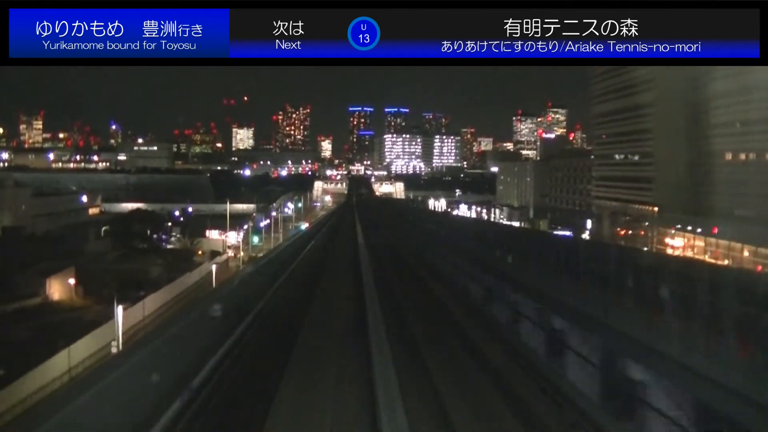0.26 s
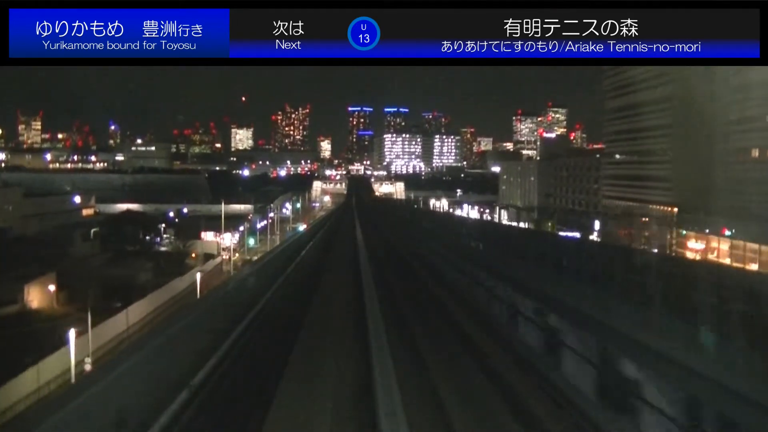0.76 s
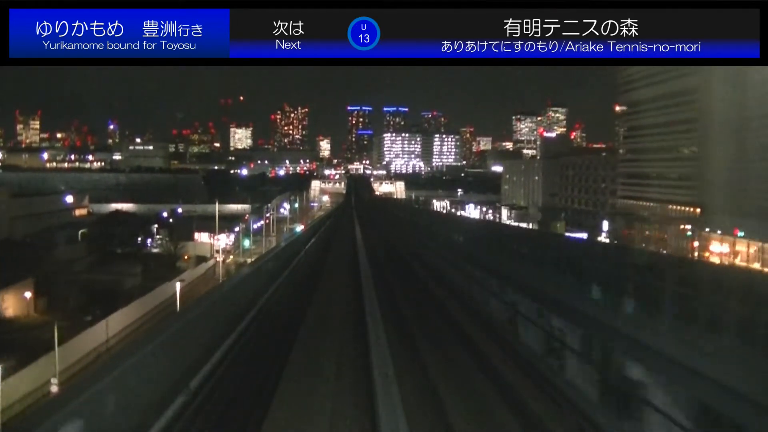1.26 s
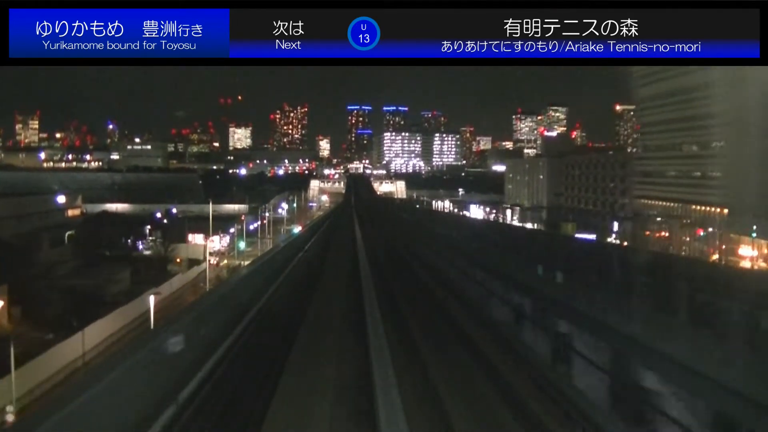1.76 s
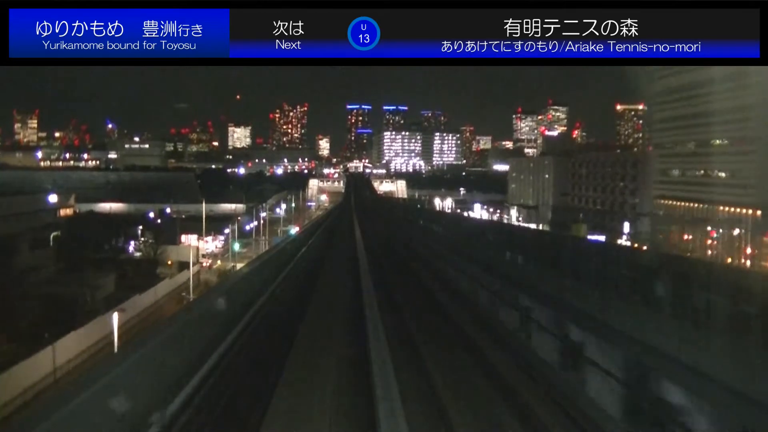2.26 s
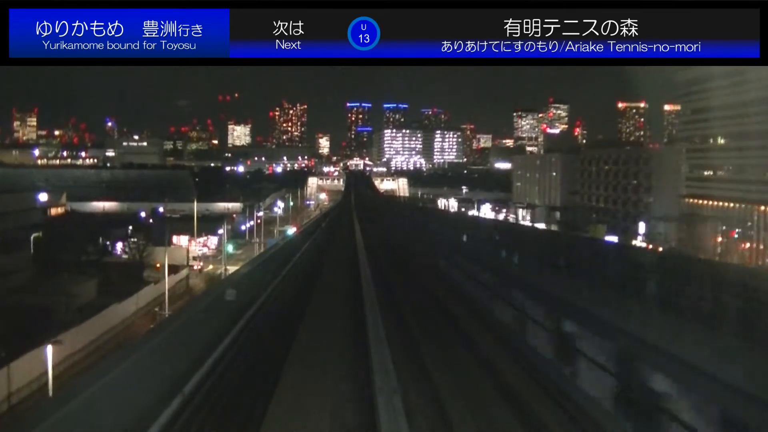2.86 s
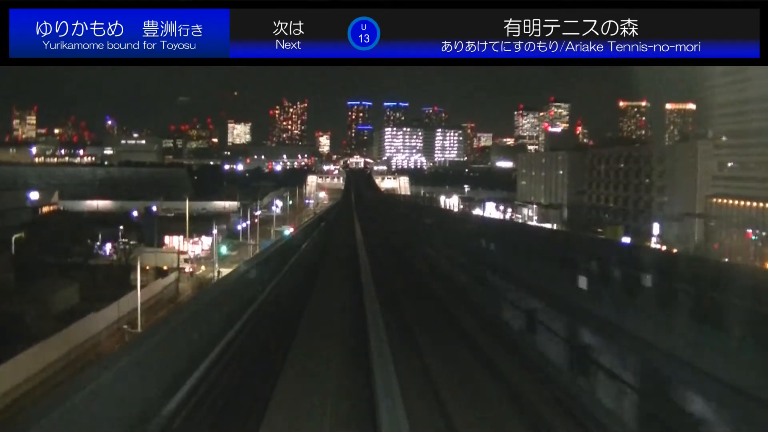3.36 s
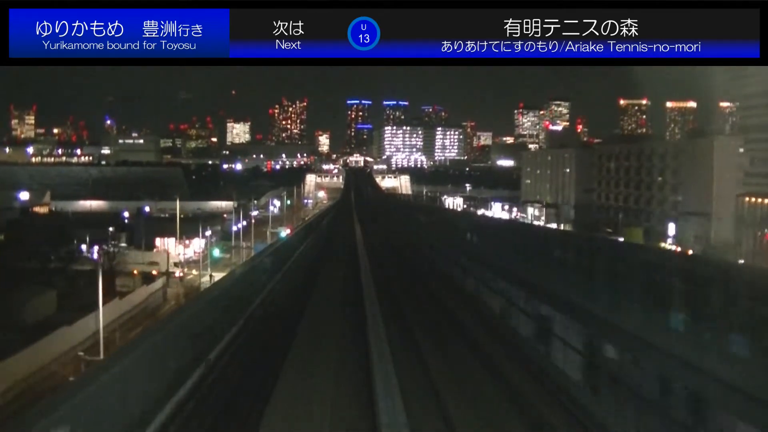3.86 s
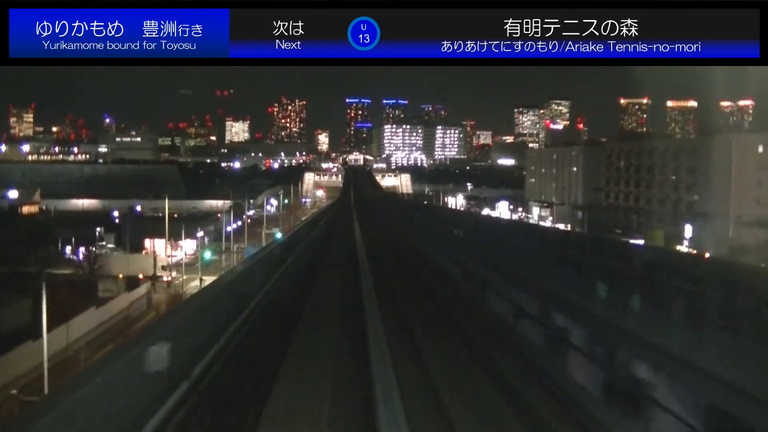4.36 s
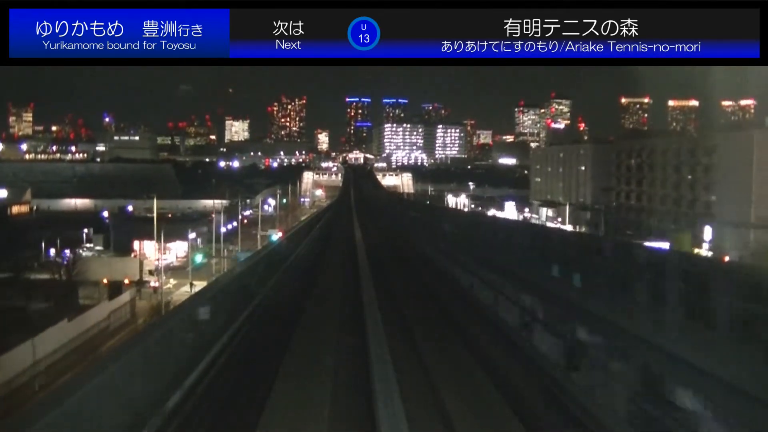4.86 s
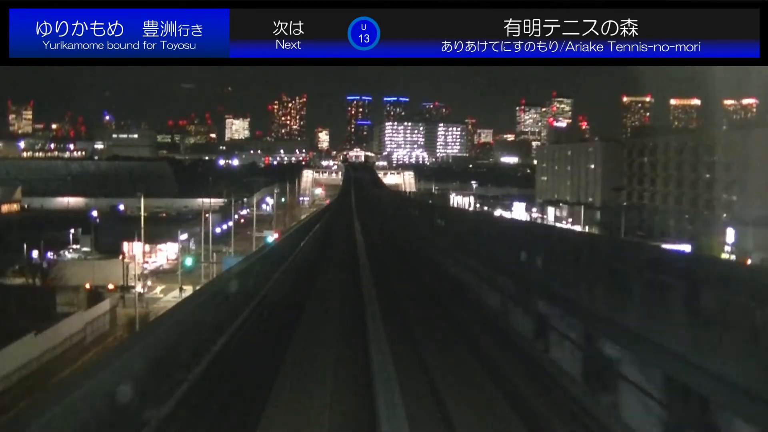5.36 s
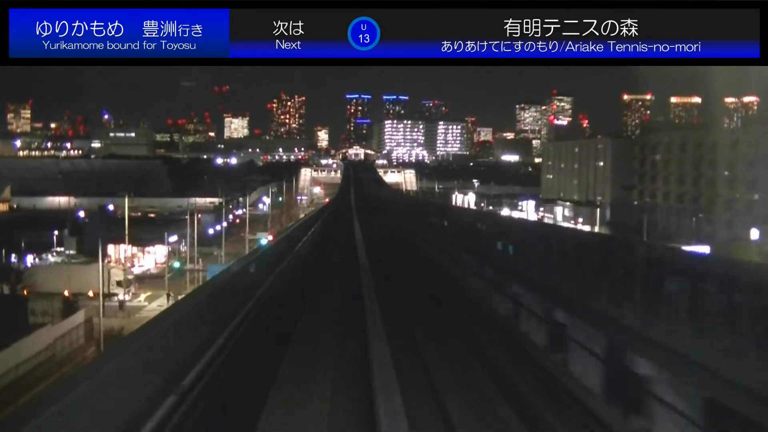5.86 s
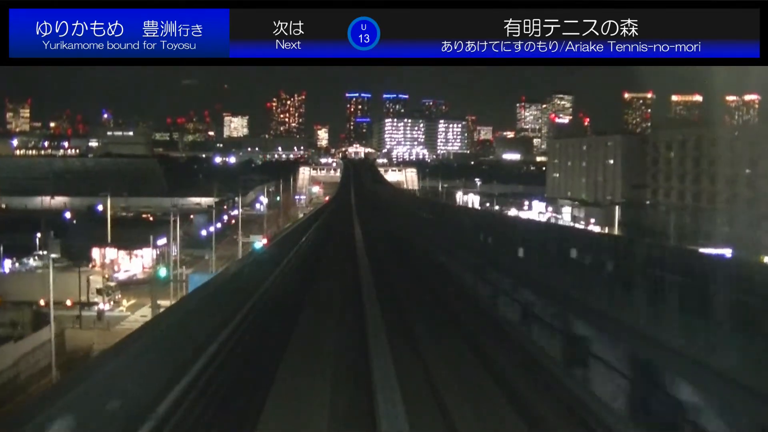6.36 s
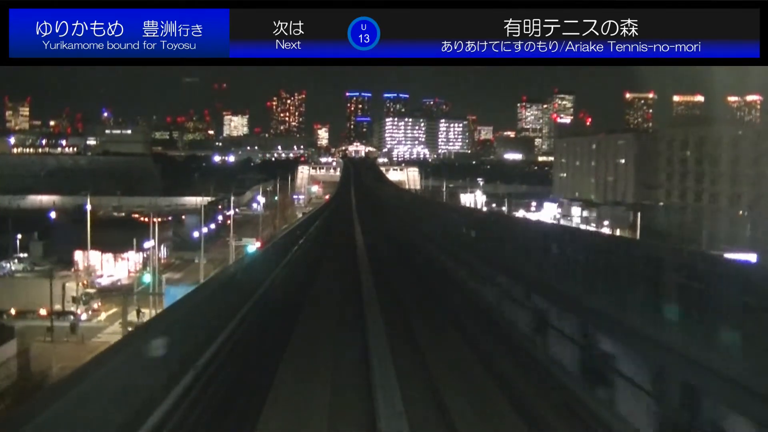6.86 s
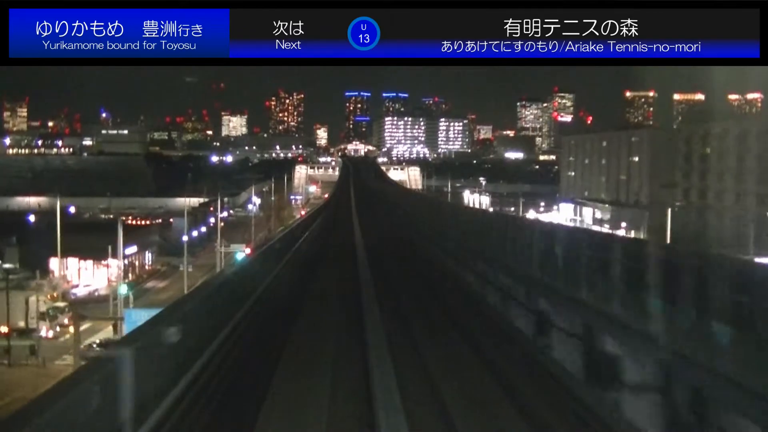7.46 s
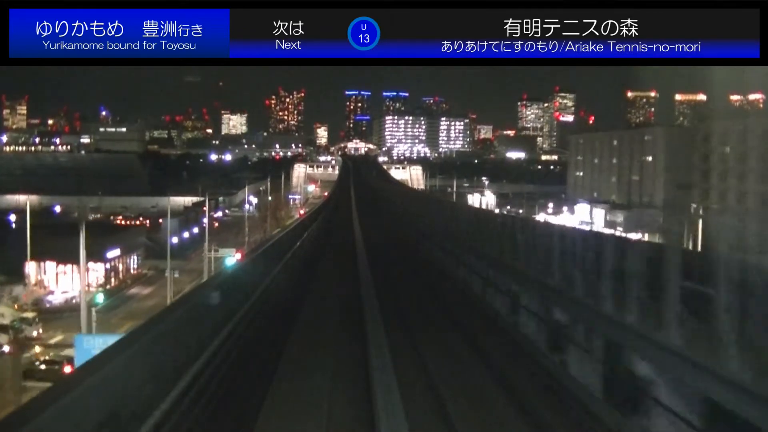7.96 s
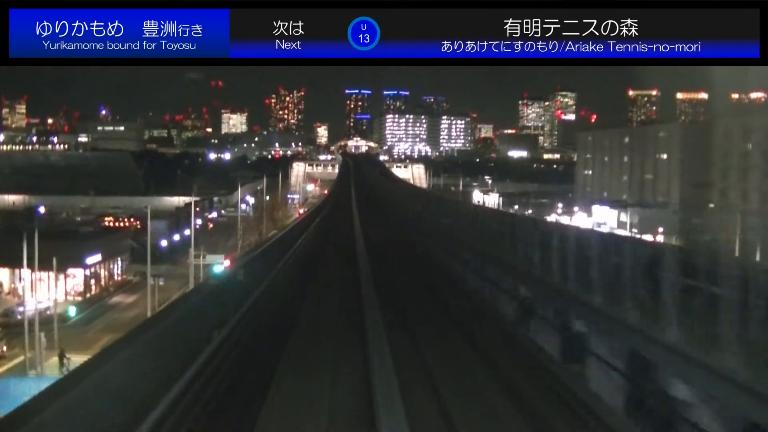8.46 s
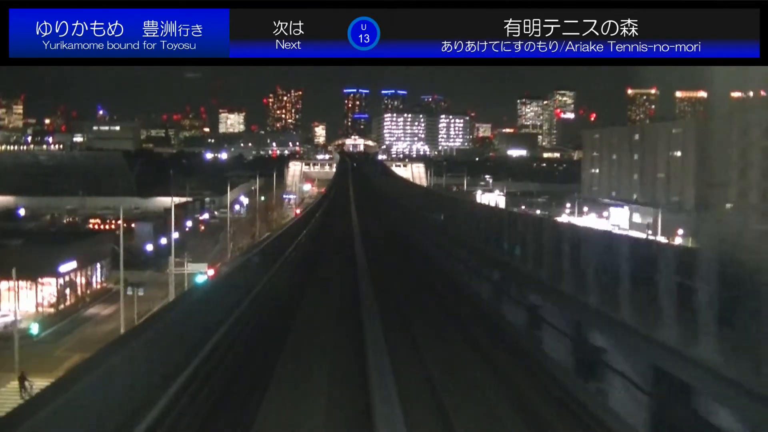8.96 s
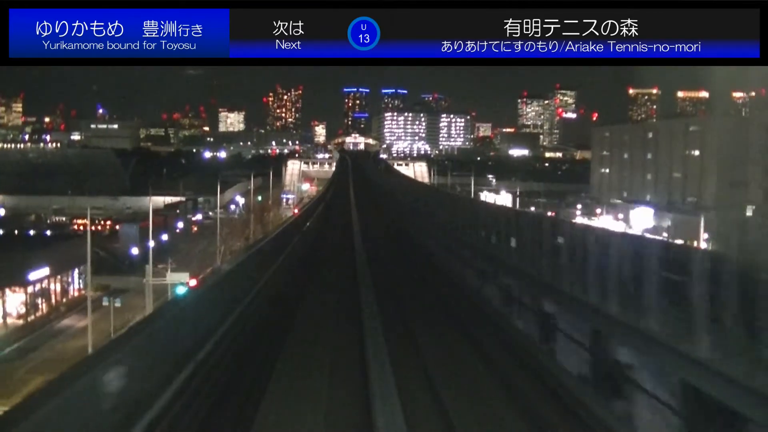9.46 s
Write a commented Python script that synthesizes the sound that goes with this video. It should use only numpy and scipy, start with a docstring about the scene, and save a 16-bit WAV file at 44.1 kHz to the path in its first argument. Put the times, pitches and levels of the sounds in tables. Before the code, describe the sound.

A rubber-tyred train rolls along concrete, heard from inside: steady rumble, dull bumps and a whine that climbs, then levels off.

```python
"""Riding a rubber-tyred train

Inside the front car, the train gathers speed on a concrete track, then cruises. The tyres roar,
the motors whine and beat, and at speed the whine comes in swells. The cabin booms, and bumps and
joints set floor and walls thudding. Gears hum, the inverter sings, and loose trim rustles and ticks."""
import sys
import numpy as np
from scipy import signal
from scipy.fft import rfft, irfft, next_fast_len
from scipy.io import wavfile
from scipy.ndimage import uniform_filter1d

SR = 44100
rng = np.random.default_rng(int(sys.argv[2]) if len(sys.argv) > 2 else 0)


def wrap_up_sound(samples):
    """Save the sound to the file named by the first command line argument, as 16-bit audio."""
    columns = np.atleast_2d(samples).T
    # keep every value between -1 and 1, then stretch to whole-number steps
    tamed = np.clip(columns, -1, 1)
    steps = np.round(tamed * 32767).astype(np.int16)
    wavfile.write(sys.argv[1], SR, steps)


N = 428652
TIME = np.arange(N) / SR
FFT_SIZE = 2 * next_fast_len(N // 2 + 1)
HZ = np.fft.rfftfreq(FFT_SIZE, 1 / SR)


# Coarser concrete roars louder. Each row: time in seconds, level in dB.
ROAR_LEVEL = [(0, -24.5), (.8, -22.5), (1.57, -22.5), (1.75, -20.5), (3.8, -19.5), (4.5, -21), (5.45, -19),
              (5.9, -21), (7.3, -19), (7.82, -20), (8.02, -22), (9.45, -21.5), (9.72, -19.5)]
# The tone of the roar and of the hiss. Each row: frequency in Hz, relative level in dB.
ROAR_TONE = [(150, -41.5), (380, -5.5), (520, -2), (720, -1.5), (870, -2), (1050, -5.5), (1250, -9),
             (1450, -18), (2000, -26.5), (5000, -78)]
HISS_TONE = [(600, -25.5), (1400, -6), (1900, 0), (2500, -0.5), (3000, -8), (3600, -11.5), (4300, -19),
             (5500, -20.5), (8000, -31), (12000, -75)]
# Where windows and panels ring. Each row: frequency in Hz, width in Hz, boost in dB.
PANEL_RINGS = [(614, 59, 1), (666, 32, 1.5), (751, 41, 0), (790, 140, 1.5), (1020, 47, 2), (1300, 95, -1),
               (1662, 140, 4.5), (2570, 360, -1)]

def tyres(roar_db=0.63, hiss_db=-34.5, hiss_share=0.17, grit_db=0.74):
    """Tread on concrete roars and hisses through the panels, fluttering with the surface's grain."""
    level_db = curves(ROAR_LEVEL)[0]
    _, _, boost_db = rough_patches()
    panels = resonances(PANEL_RINGS)
    roar = steadied(noise(spectrum(ROAR_TONE) + panels), samples=7000)
    roar *= gain_of(level_db + roar_db + boost_db)
    hiss = noise(spectrum(HISS_TONE) + panels)
    hiss *= gain_of(hiss_db + hiss_share * (level_db - level_db.mean()))
    return (roar + hiss) * gain_of(grit_db * wander(30))


# The note of the whine. Each row: time in seconds, pitch in Hz.
WHINE_PITCH = [(0, 401), (0.5, 414.5), (1, 428), (1.4, 439), (1.62, 431), (2, 438), (2.7, 444), (4, 451),
               (4.8, 451), (5.25, 449.7), (5.7, 456.2), (6.5, 447.6), (7.5, 449.6), (8.6, 447.8),
               (9.72, 444)]
# The whine's steady part, loudest while speeding up. Each row: time in seconds, level in dB.
WHINE_LEVEL = [(0, -10.5), (.12, -17.5), (.23, -10), (.35, -14.5), (.58, -13), (.66, -17), (.95, -14.5),
               (1.14, -15), (1.22, -17.5), (1.38, -23.5), (1.7, -29.5), (2.12, -39), (2.35, -27),
               (2.52, -38), (3.2, -25), (4.2, -34.5), (4.56, -36), (4.7, -25), (5.5, -24.5), (6.4, -22.5),
               (7, -25), (7.18, -37), (7.4, -24), (9.72, -26.5)]
# The second motor joins in. Each row: time in seconds, level in dB compared with the first.
SECOND_MOTOR = [(0, -29.5), (1.1, -14.5), (1.5, -10.5), (9.72, -12)]

def motors(steady_db=-1.35, swell_db=-3.0, slower_hz=9, flutter_db=0.8, unrest_db=1.02):
    """Two motors whine; the second runs a little slower, beats with the first and unsettles it."""
    second_gain = gain_of(curves(SECOND_MOTOR)[0])
    unrest = second_gain / second_gain.max()
    swell_gain, shift_hz = swells()
    pitch = curves(WHINE_PITCH)[0] + shift_hz + 1.5 * wander(6.8) + 3 * unrest * wander(22)
    second_pitch = pitch - slower_hz + 4 * wander(4.92)
    whine = np.sin(phase_of(pitch)) + second_gain * np.sin(phase_of(second_pitch))
    steady_gain = gain_of(curves(WHINE_LEVEL)[0] + steady_db)
    level = np.hypot(steady_gain, gain_of(swell_db) * swell_gain * throb())
    flutter = gain_of((flutter_db + unrest_db * unrest) * wander(30))
    return np.sqrt(2) * whine * level * flutter


# Swells in the whine. Each row: start in seconds, length in seconds, level in dB, pitch shift in Hz.
WHINE_SWELLS = [(1.412, 0.06, -20, 1), (1.489, 0.025, -14, -2), (1.535, 0.051, -13, -5),
                (1.603, 0.056, -12.5, -1), (1.777, 0.026, -17.5, 9), (1.88, 0.046, -17, 0),
                (1.955, 0.094, -19, -1), (2.304, 0.045, -16.5, -3), (2.395, 0.031, -16, 7),
                (2.664, 0.17, -17, -4), (2.85, 0.085, -18, -4), (3.106, 0.062, -23, -2),
                (4.636, 0.11, -14, 1), (4.782, 0.072, -15, 3.5), (4.88, 0.085, -16.5, -1),
                (5.021, 0.057, -17, 0), (5.161, 0.048, -11, 2), (5.227, 0.12, -18.5, -3.5),
                (5.35, 0.05, -22, 2.5), (5.489, 0.14, -19, -2), (5.696, 0.041, -15, -2.5),
                (5.981, 0.063, -14.5, -4.5), (6.11, 0.036, -24, -18), (6.265, 0.1, -18, 0),
                (6.495, 0.08, -12.5, -1), (6.62, 0.028, -16, 9), (6.755, 0.039, -14.5, 0),
                (6.857, 0.077, -19, -4), (6.952, 0.056, -15, 3.5), (7.042, 0.067, -14.5, -2),
                (7.291, 0.063, -14.5, 0), (7.418, 0.095, -14.5, -2.5), (7.561, 0.13, -11.5, 0),
                (7.72, 0.055, -15.5, 2), (7.957, 0.057, -17.5, -3.5), (8.106, 0.069, -18, -1.5),
                (8.228, 0.079, -13.5, -1), (8.351, 0.038, -21, -14.5), (8.437, 0.12, -16.5, -2.5),
                (8.62, 0.034, -14.5, -2.5), (8.685, 0.23, -16, -0.5), (8.996, 0.048, -14, -4.5),
                (9.127, 0.058, -16, -4), (9.39, 0.11, -13.5, -3), (9.663, 0.085, -16, 4)]

def swells(edge_s=0.015, arch_share=0.032):
    """Gain and pitch shift of the whine: each swell fades in quickly, arches and fades out."""
    gain, shift_hz = np.zeros((2, N))
    for start, length, db, hz in WHINE_SWELLS:
        inside_s = length / 2 - abs(TIME - start - length / 2)
        fade = np.clip((1 + inside_s / edge_s) / 2, 0, 1)
        arch = 2 * np.clip(2 * inside_s / length, 0, 1) - 1
        gain += gain_of(db) * fade * (1 + arch_share * arch)
        shift_hz += hz * fade
    return gain, shift_hz


def throb(rate_hz=7.57, depth_db=0.3, dip_at_s=6.527):
    """A slight, regular pulse in the whine's swells, as a gain."""
    return gain_of(-depth_db * np.cos(2 * np.pi * rate_hz * (TIME - dip_at_s)))


# The tone of suspension, floor and walls. Each row: frequency in Hz, relative level in dB.
SHAKE_TONE = [(8, -19.5), (20, -0.5), (35, -0.5), (52, -5), (75, -2.5), (95, -2.5), (130, -10.5),
              (250, -44), (600, -86)]
FLOOR_TONE = [(40, -41.5), (90, -18), (115, -8.5), (180, -4), (225, -2), (270, -1), (295, -12.5),
              (340, -27.5), (600, -74.5)]
WALL_TONE = [(150, -46.5), (260, -12), (300, 3), (335, 1), (385, -2.5), (470, -7), (600, -24), (1000, -43),
             (2500, -85)]
# How hard each of them shakes. Each row: time in seconds, level in dB.
SHAKE_LEVEL = [(0.0, -39), (0.6, -37), (1.58, -36), (3.82, -34), (5.13, -41), (5.78, -34.5), (7.63, -37.5),
               (7.98, -31.5), (8.23, -28.5), (8.68, -36.5), (8.93, -34.5), (9.72, -33.5)]
FLOOR_LEVEL = [(0, -27), (.5, -28.5), (1.3, -27), (2.6, -24), (4.8, -27), (5.9, -22.5), (7.4, -27.5),
               (8.1, -23), (8.7, -22.5), (9.72, -25.5)]
WALL_LEVEL = [(0, -25), (.6, -28.5), (1.2, -25), (2.6, -27), (3.5, -26.5), (4.8, -22.5), (5.8, -28),
              (6.3, -26), (7.5, -27), (7.85, -21.5), (8.4, -28), (9.1, -23), (9.72, -25.5)]
# Dull thuds from bumps in the track.
# Each row: start in seconds, level in dB, centre in Hz, spread each way in Hz, decay in seconds.
TRACK_BUMPS = [(.09, -18.5, 258, 13, 0.052), (.945, -13.5, 323, 26, 0.041), (1.205, -16, 341, 52, .05),
               (1.31, -15, 340, 61, .07), (2.345, -15, 335.8, 75, .05), (2.6, -14, 470, 34, 0.068),
               (2.775, -16, 259.6, 16, 0.063), (3.23, -14.5, 340, 50, 0.053), (3.45, -14.5, 333, 32, 0.044),
               (3.788, -13.5, 333, 50, .03), (3.85, -18, 260.4, 22.5, 0.075), (3.895, -8, 342, 66, 0.025),
               (4.01, -14.5, 340, 35, .045), (4.172, -13.5, 384, 69, .025), (4.222, -11.5, 365, 46, 0.048),
               (4.352, -10.5, 416, 12, 0.026), (4.5, -17, 347.3, 65, 0.061), (4.545, -14.5, 221, 16, 0.042),
               (6.055, -16, 222.7, 15.6, .044), (6.14, -14, 330, 58, 0.034), (6.275, -13.5, 302, 75, 0.042),
               (6.37, -15, 320.2, 81, .035), (7.27, -27.5, 147.2, 19.5, .21), (7.71, -9, 328, 70, 0.028),
               (7.825, -8.5, 615, 250, 0.038), (7.852, -14, 354, 57, 0.038), (8.935, -15, 281.2, 43, .045),
               (9.11, -17, 300, 65, 0.047), (9.315, -9, 337, 80, .045), (9.41, -15, 322, 66, 0.038)]

def car_body():
    """The uneven track shakes the car, so floor and walls drum and bumps thud."""
    floor_boost, wall_boost, _ = gain_of(rough_patches())
    shake = rumble(SHAKE_TONE, SHAKE_LEVEL, offset_db=0.2, surge_db=2.0, samples=9000)
    floor = rumble(FLOOR_TONE, FLOOR_LEVEL, offset_db=-1.54, surge_db=1.0, samples=7000)
    walls = rumble(WALL_TONE, WALL_LEVEL, offset_db=1.6, surge_db=2.0, samples=6000)
    return shake + floor * floor_boost + walls * wall_boost + knocks(TRACK_BUMPS, rise_s=0.0082)


# Where the cabin air booms. Each row: frequency in Hz, width in Hz, boost in dB.
CABIN_RINGS = [(67.9, 11, 13.5), (80, 9, 7.5), (151.7, 15, 7), (204, 17, 5), (221.4, 18, 7),
               (260.7, 15.8, 9.5), (298, 17, 1), (335, 13, 5), (357, 36, 5), (449, 90, 6.5)]

def rumble(tone, levels, offset_db, surge_db, samples):
    """One part of the car rumbles through the cabin air, surging at random."""
    sound = steadied(noise(spectrum(tone) + resonances(CABIN_RINGS)), samples)
    return sound * gain_of(curves(levels)[0] + offset_db + surge_db * wander(3))


# Rough track. Each row: time in seconds, then boosts in dB for floor, walls and tyre roar.
ROUGH_PATCHES = [(.79, 7, -3, 1), (1.34, 2, 4, -1), (1.74, -1, 2.5, -0.5), (2.8, -3, 0, 1.5),
                 (2.96, -0.5, 6, -0.5), (3.25, 6, 5, -0.5), (3.8, 1.5, 1, 1), (3.919, -3, 4, -0.5),
                 (4.24, 4, 1.5, 0), (5.32, 3, 1, -0.5), (6.12, 6.5, 2.5, 1), (6.761, 0.5, 2.5, 1),
                 (7.32, 4, 1.5, 1), (8.78, -4, 1.5, 0.5)]

def rough_patches(half_length_s=0.066):
    """The car booms on each rough patch: brief changes in dB for floor, walls and roar."""
    return sum(np.outer(boosts_db, np.exp(-((TIME - middle) / half_length_s) ** 2))
               for middle, *boosts_db in ROUGH_PATCHES)


# Joints in the concrete. Each row: start in seconds, level in dB.
TRACK_JOINTS = [(1.68, -8.5), (4.553, -11.5)]
# The tone of their thud. Each row: frequency in Hz, relative level in dB.
THUD_TONE = [(90, -24), (180, -8), (280, 7), (400, -1), (520, -6), (700, 0), (900, -6), (1400, -25),
             (2500, -46), (8000, -100)]

def joints(push_db=1, push_s=0.00057, rebound_s=0.009, rise_s=0.0015, decay_s=0.014):
    """Front and back of the tread each give a soft push, and the car answers with a dull thud."""
    body = steadied(noise(spectrum(THUD_TONE)), samples=400)
    out = np.zeros((2, N))
    for start, db in TRACK_JOINTS:
        push_time = np.array([TIME - start, TIME - start - rebound_s]) / push_s - 2
        pushes = (2 * push_time * np.exp(-push_time ** 2)).sum(0)
        age = np.maximum(TIME - start, 0)
        thud = body * (1 - np.exp(-(age / rise_s) ** 2)) * np.exp(-age / decay_s)
        out += gain_of(db) * (gain_of(push_db) * pushes + thud)
    return out


# The drive's pull. Each row: time in seconds, hum pitch in Hz, hum level in dB, inverter level in dB.
DRIVE_PULL = [(0, 194, -38.5, -58), (0.4, 199, -26, -52), (0.8, 205, -25, -51), (1.4, 213.2, -29.5, -50),
              (1.8, 218, -28, -55), (2.15, 221, -28, -59), (2.5, 223, -39.5, -65.5), (4.2, 226, -37, -67.5),
              (5.3, 226, -35.5, -60.5), (6.2, 225, -42, -67), (9.72, 222, -37, -70.5)]
# Tones of meshing gear teeth. Each row: multiple of the hum's pitch, level in dB.
GEAR_TONES = [(5.48, -41.5), (7.66, -53.5)]

def gearbox(hum_db=-1.3, teeth_db=-2, load_share=0.55):
    """A low hum and faint gear tones climb with speed and grow louder under load."""
    pitch, level_db, _ = curves(DRIVE_PULL)
    phase = phase_of(pitch)
    hum = np.sin(phase + 0.45 * wander(20)) * gain_of(level_db + hum_db + 1.7 * wander(6.1))
    teeth = sum(np.sin(multiple * phase + 0.53 * wander(12)) * gain_of(db + 3 * wander(20))
                for multiple, db in GEAR_TONES)
    teeth *= gain_of(teeth_db + load_share * (level_db - level_db.mean()))
    return np.sqrt(2) * (hum + teeth)


# Thin tones from switching the motors' power. Each row: pitch in Hz, relative level in dB.
INVERTER_TONES = [(1650, -4), (3301, -1.5), (4001, -19.5)]

def inverter(flutter_db=3.5, drift_cycles=0.068):
    """Switching tones, strongest while speeding up, reach each side by slowly shifting paths."""
    out = np.zeros((2, N))
    for side in out:
        for hz, db in INVERTER_TONES:
            tone = np.sin(2 * np.pi * (hz * TIME + drift_cycles * wander(6)))
            side += tone * gain_of(db + flutter_db * wander(14))
    _, _, level_db = curves(DRIVE_PULL)
    return np.sqrt(2) * out * gain_of(level_db)


# The tone of the rustle. Each row: frequency in Hz, relative level in dB.
RUSTLE_TONE = [(2000, -32.5), (3300, -6), (3900, 2.5), (4600, -0.5), (5500, -2), (6800, -1), (8000, -5.5),
               (9200, -11.5), (10300, -22.5), (11500, -30)]
# How loud it is. Each row: time in seconds, level in dB.
RUSTLE_LEVEL = [(0, -58.5), (.5, -57), (1.25, -57.5), (2.1, -51.5), (2.7, -55), (5.3, -58.5), (5.77, -51),
                (6.15, -63), (7.05, -55.5), (7.66, -63), (8.36, -51), (9.3, -63), (9.72, -54.5)]
# Brief scuffs with one long rub, and sharp ticks.
# Each row: start in seconds, level in dB, centre in Hz, spread each way in Hz, decay in seconds.
TRIM_SCUFFS = [(0.315, -52, 6400, 2200, .04), (0.58, -56, 7500, 2000, .05), (0.875, -53, 6830, 1518, 0.032),
               (1.195, -49, 6432, 1600, 0.04), (4.835, -49, 6037, 173, 0.023),
               (7.49, -40, 5680, 450, 0.024), (7.492, -47, 7370, 1691, 0.03),
               (7.78, -54.5, 3910, 302, 0.88), (7.8, -49, 7000, 1900, 0.031),
               (7.95, -47, 7670, 1900, 0.019), (8.09, -53, 7960, 2410, 0.034),
               (8.315, -48, 7770, 2200, .02), (8.39, -54.5, 7800, 2200, 0.019),
               (8.5, -45, 7290, 1500, 0.027), (8.555, -45, 7050, 1200, .015),
               (8.645, -50, 7006, 1100, 0.026)]
FITTING_TICKS = [(1.835, -50, 7540, 3480, 0.0086), (2.122, -43, 5180, 3000, 0.0064)]

def loose_trim(rustle_db=1.3, scuff_db=3.0, grain_db=2.0, sway_db=3.0):
    """Panels rustle and scuff as they rub in the swaying car, and fittings tick."""
    rustle = noise(spectrum(RUSTLE_TONE))
    rustle *= gain_of(curves(RUSTLE_LEVEL)[0] + rustle_db + sway_db * wander(10))
    scuffs = gain_of(scuff_db) * knocks(TRIM_SCUFFS, rise_s=0.007)
    grain = gain_of(grain_db * wander(120))
    return (rustle + scuffs) * grain + knocks(FITTING_TICKS, rise_s=0.0008)


def knocks(rows, rise_s):
    """Each blow swells quickly and dies away in the frequency band of the thing it shakes."""
    out = np.zeros((2, N))
    image = stereo_image()
    for start, db, hz, spread, decay_s in rows:
        edges_hz = np.clip([hz - spread, hz + spread], 20, 0.49 * SR)
        band = signal.butter(4, edges_hz, "band", fs=SR, output="sos")
        # The first second is skipped so that the filter has settled.
        left, other = signal.sosfilt(band, rng.standard_normal((2, 3 * SR)))[:, SR:]
        alike, lean = [np.interp(hz, HZ, curve) for curve in image]
        right = alike * left + np.sqrt(1 - alike ** 2) * other
        pair = steadied(np.array([left * lean, right / lean]), samples=1300)
        part = out[:, round(start * SR):][:, :len(left)]
        age = TIME[:part.shape[1]]
        envelope = (1 - np.exp(-age / rise_s)) * np.exp(-age / decay_s)
        part += pair[:, :len(age)] * gain_of(db) * envelope
    return out


def noise(tone_db):
    """Stereo noise of a given tone: the two sides share the bass and differ in the treble."""
    alike, lean = stereo_image()
    shared, apart = rfft(rng.standard_normal((2, FFT_SIZE)))
    mid, side = np.sqrt(1 + alike) * shared, np.sqrt(1 - alike) * apart
    pair = np.array([(mid + side) * lean, (mid - side) / lean])
    return evened(irfft(pair * gain_of(tone_db))[:, :N])


# How alike left and right sound. Each row: frequency in Hz, likeness (1 means the same).
SIDE_LIKENESS = [(20, 1), (70, 0.98), (200, 1), (380, 1), (600, 0.99), (1000, 0.98), (1300, 0.88),
                 (1550, 0.5), (2600, 0.85), (3200, .5), (3900, .56), (4500, .37), (6600, 0.46),
                 (7900, -0.19), (10000, 0)]
# Which side is louder. Each row: frequency in Hz, left minus right in dB.
SIDE_BALANCE = [(60, .5), (400, 0.5), (750, -1), (1600, 1), (2200, -3), (2650, 0), (3200, -3), (3900, 1.5),
                (4400, -2.5), (5000, 1.5), (6700, 4), (8400, -1), (9450, -9), (10200, -3.5)]

def stereo_image():
    """Likeness of the two sides, and the left side's gain, at every frequency."""
    return np.clip(spectrum(SIDE_LIKENESS), -0.994, 0.994), gain_of(spectrum(SIDE_BALANCE) / 2)


def gain_of(db):
    """Turns decibels into a gain to multiply by."""
    return 10 ** (np.asarray(db) / 20)


def phase_of(pitch_hz):
    """Adds up a changing pitch into the angle of a sine wave."""
    return 2 * np.pi * np.cumsum(pitch_hz) / SR


def evened(x):
    """Scales a signal to an average (rms) level of 1."""
    return x / np.sqrt(np.mean(x ** 2) + 1e-20)


def steadied(x, samples):
    """Holds the level near 1 over every stretch of this many samples."""
    return x / np.sqrt(uniform_filter1d((x ** 2).mean(0), samples) + 1e-12)


def curves(rows):
    """Joins the rows of a time table into one curve for each value column."""
    times, *columns = np.transpose(rows)
    return [np.interp(TIME, times, column) for column in columns]


def spectrum(rows):
    """Joins the rows of a frequency table into a curve, on a log scale."""
    hz, values = np.transpose(rows)
    return np.interp(np.log(HZ + 1), np.log(hz + 1), values)


def resonances(rows):
    """The boost in dB around the frequencies where something rings."""
    return sum(db * np.exp2(-(2 * (HZ - hz) / width) ** 2) for hz, width, db in rows)


def wander(rate_hz):
    """Random drift of about size 1; a higher rate moves faster."""
    smoothing = np.exp(-(HZ / rate_hz) ** 2)
    return evened(irfft(rfft(rng.standard_normal(FFT_SIZE)) * smoothing)[:N])


def scene():
    """Everything heard in the cabin."""
    return car_body() + joints() + tyres() + motors() + gearbox() + inverter() + loose_trim()


def record(dry, cutoff_hz=11300):
    """Softens both ends and cuts the highest treble."""
    fades = signal.windows.tukey(N, 0.001)
    lowpass = signal.firwin(511, cutoff_hz, window=("kaiser", 9), fs=SR)
    return signal.oaconvolve(dry * fades, lowpass[None], "same")


dry = scene()
out = record(dry)
wrap_up_sound(out)
```